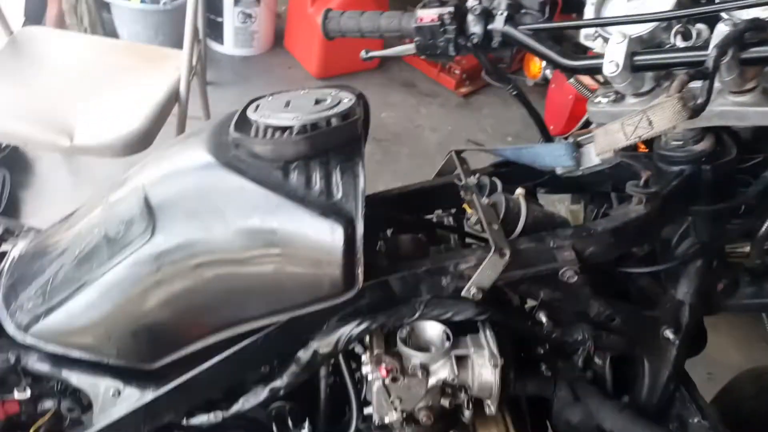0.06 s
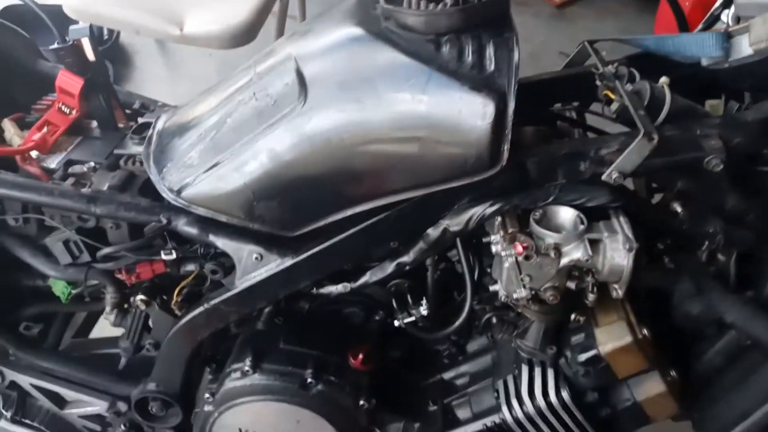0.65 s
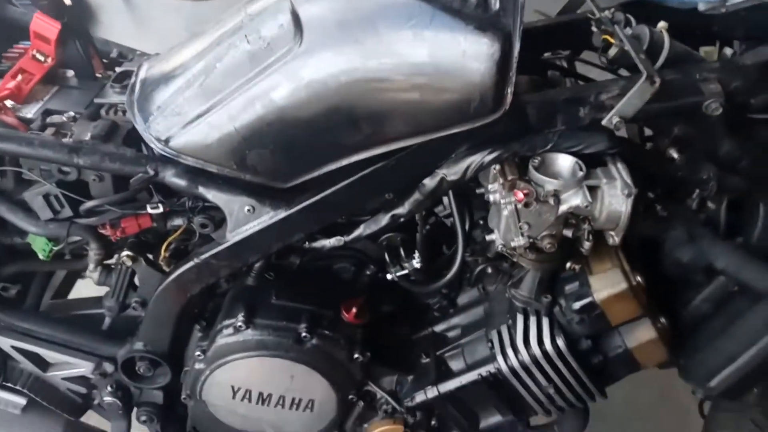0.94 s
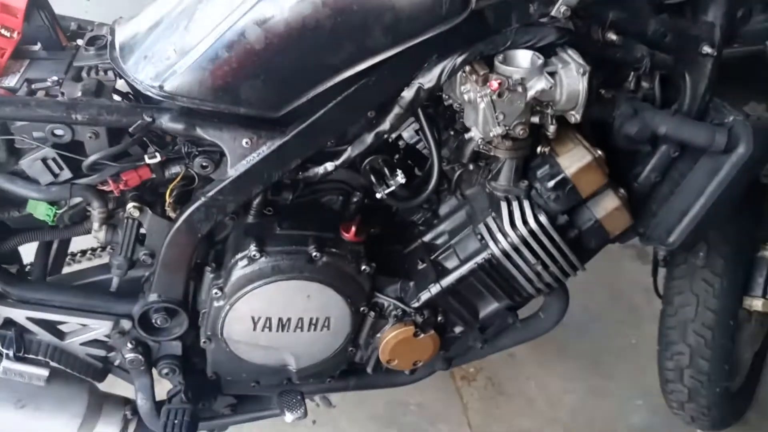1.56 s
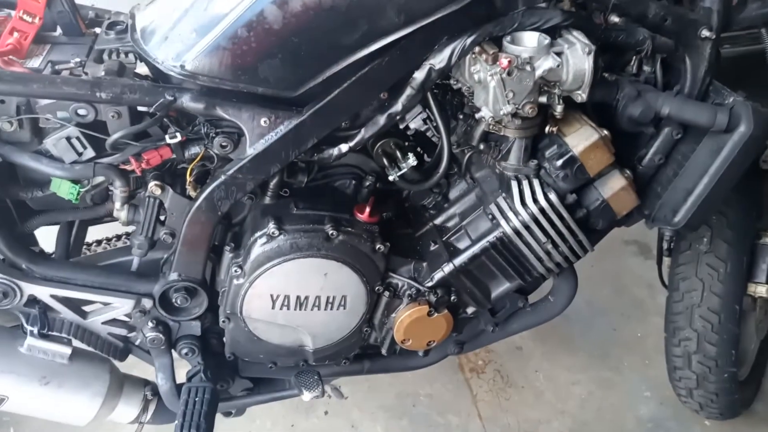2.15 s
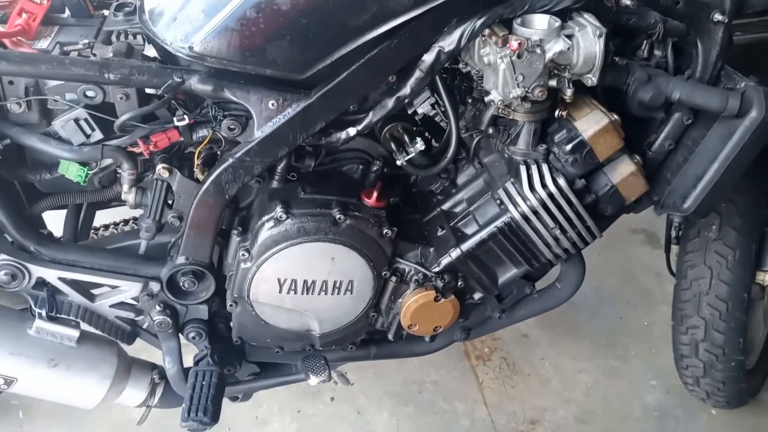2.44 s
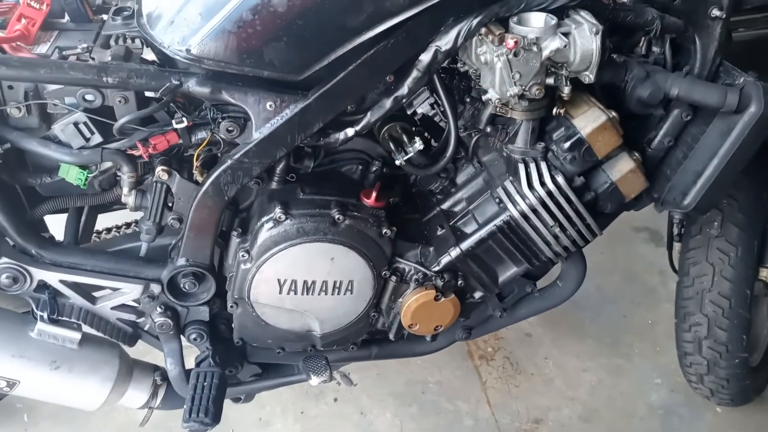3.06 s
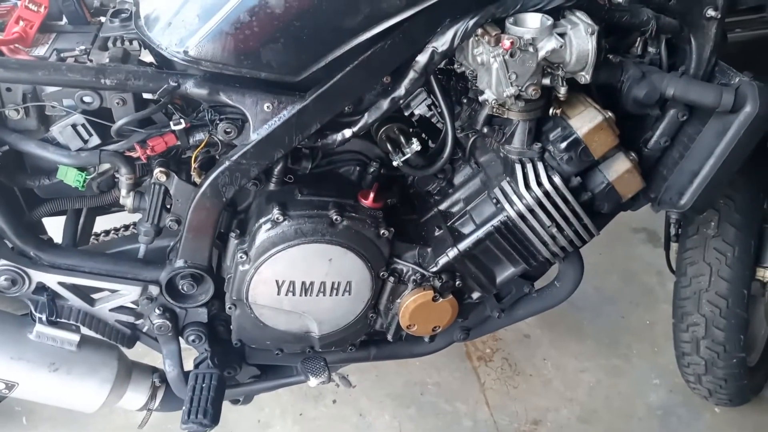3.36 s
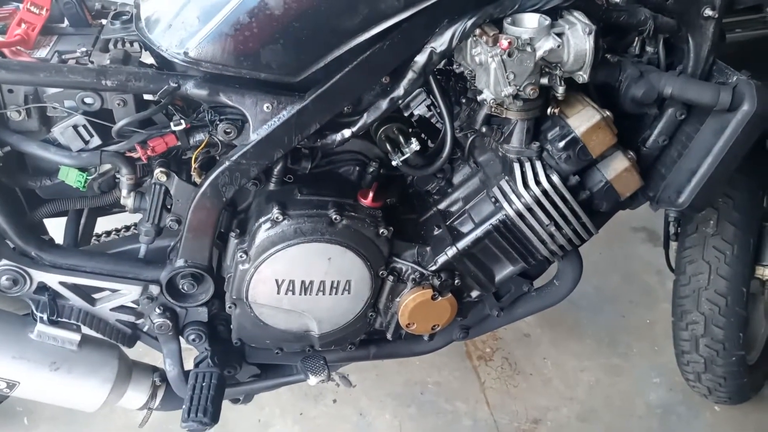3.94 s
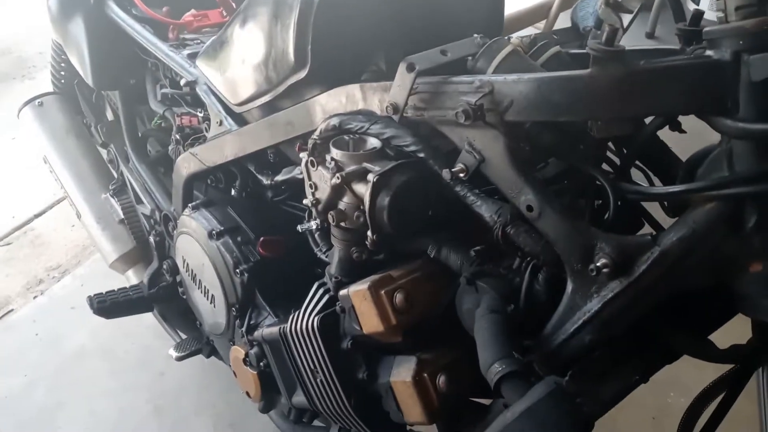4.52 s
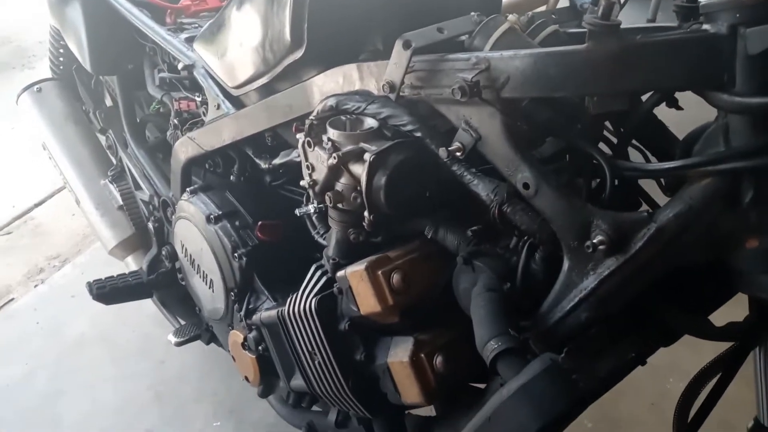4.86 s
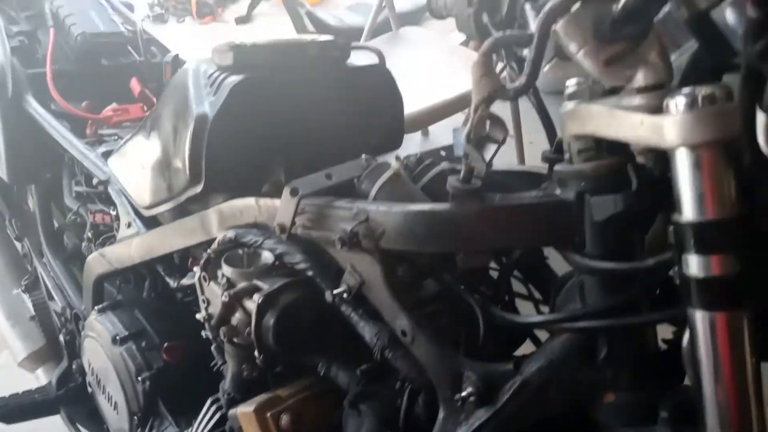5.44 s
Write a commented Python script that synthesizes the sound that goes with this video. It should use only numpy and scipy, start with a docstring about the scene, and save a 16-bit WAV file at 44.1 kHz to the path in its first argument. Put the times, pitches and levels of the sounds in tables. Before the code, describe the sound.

A motorcycle engine is revved once and sinks to a lumpy idle, then after a brief gap idles fast and steadily.

```python
"""A motorcycle booms close by in a garage: a blip of the throttle, then a slow sink to a lumpy idle
in which one of its four cylinders skips. Each firing thumps and rings the exhaust pipes; gears whine,
pistons knock, valves clatter and the open carburettor (the engine's air inlet) hisses.
After a short silence the sound fades in again from the front of the engine, at a fast, steady idle."""
import sys
import numpy as np
from scipy import signal
from scipy.fft import rfft, irfft, next_fast_len
from scipy.io import wavfile
from scipy.ndimage import uniform_filter1d, map_coordinates

SR = 44100
rng = np.random.default_rng(int(sys.argv[2]) if len(sys.argv) > 2 else 0)


def inscribe(sig):
    """Save sig as 16-bit PCM at rate SR to the path in sys.argv[1].

    A 1-D sig is mono; a 2-D sig holds one channel per row.
    Samples are clipped to [-1, 1] before scaling.
    """
    pcm = np.round(np.clip(np.atleast_2d(sig).T, -1, 1) * 32767)
    wavfile.write(sys.argv[1], SR, pcm.astype(np.int16))


N = 250929
TIME = np.arange(N) / SR


def exhaust(cycles, cylinders, pipe, first_gains, gas_db, thump_hz, puff_hz, scatter_db, jitter):
    """Each firing thumps out of the tailpipe and rings the pipes; swirling gas rings them too."""
    blows, thumps = 0, 0
    for k, (place, ring_db, thump_db) in enumerate(cylinders):
        gains = first_gains if k == 0 else every_cycle(cycles)
        firing = pulses(cycles, place, gains, scatter_db, jitter)
        blows += undb(ring_db) * firing
        thumps += undb(thump_db) * firing
    blows += undb(gas_db) * blows.std() * rng.standard_normal(N)
    puffs = resonate(blows, pipe) + band(thumps, 155, thump_hz, order=1)
    # a valve takes a moment to open, which rounds every puff
    rounded = signal.sosfilt(signal.butter(2, puff_hz, fs=SR, output="sos"), puffs)
    return steady(band(chambers(rounded), 81, 914))


def misfires(cycles, miss_db):
    """Strength of the dirty first cylinder in each cycle: when it fails to fire it only puffs."""
    # its firing pattern: (start time [s], fires once in [cycles], level when it fires [dB])
    pattern = [(0, 1, 0), (1.21, 1, -9), (1.52, 1, -3), (2.56, 2, 0), (2.83, 1, 0), (3.0, 2, 2),
               (3.72, 2, 2)]
    gains = every_cycle(cycles)
    for start_s, every, db in pattern:
        first = int(np.interp(start_s, TIME, cycles)) + 1
        fires = np.arange(len(gains) - first) % every == 0
        gains[first:] = undb(np.where(fires, db, miss_db))
    return gains


def chambers(x):
    """Each silencer chamber holds one band of pitches back a little, so a crack becomes a chuff."""
    # the delayed bands: (pitch [Hz], width [Hz])
    delayed_bands = [(450, 33), (560, 85), (660, 210), (850, 85)]
    for hz, width in delayed_bands:
        x = x - 2 * ring(x, hz, width)
    return x


def boom(cycles, speed):
    """Multiples of the engine speed swell into a hum as they slide past the pipe's own pitches."""
    # pipe hums: (multiple, pipe pitch [Hz], reach [Hz], level [dB], change at open throttle [dB],
    # place in the cycle [0-1])
    hums = [(2, 86, 3.7, -22, 3, 0.12), (4, 145, 8.7, -11, -18, 0.02), (4, 200, 4.1, -5.5, -14, 0.03),
            (7, 167, 8.5, -22.5, 0, 0.02), (8, 351.4, 31, -17.5, 24.5, 0.1), (10, 349, 23, -13, 0, 0.05),
            (12, 340, 3, -14, 0, 0.01)]
    out = 0
    for multiple, hz, reach_hz, db, open_db, place in hums:
        gain = bump(multiple * speed, hz, reach_hz) * undb(db + open_db * throttle() + 0.8 * wander(24.9))
        out += gain * np.sin(2 * np.pi * multiple * (cycles - place))
    return np.sqrt(2) * out


def intake(cycles, speed):
    """Gulps of air ring the inlet pipe with a growl, which stops once the revs have sunk."""
    # the inlet's ringing: (pitch [Hz], width [Hz], relative level [dB])
    inlet = [(357, 5.4, 4.5), (481, 73, -8.5), (554, 25, -13)]
    gulps = pulses(cycles, 0.3104, every_cycle(cycles), scatter_db=3, jitter=0.0031)
    gulps += undb(-2) * pulses(cycles, 0.045, every_cycle(cycles), scatter_db=4.5, jitter=0.011)
    growl = steady(band(chambers(resonate(gulps, inlet)), 278, 830, order=2))
    stop_s, fade_s = 1.24, 0.044
    return undb(loudness("growl", speed)) * np.clip((stop_s - TIME) / fade_s, 0, 1) * growl


def carburettor(snap_s):
    """The carburettor spits as the throttle snaps open, and the overloaded microphone crackles."""
    spit = steady(band(rng.standard_normal(N), 50, 1700, order=1) * undb(9.9 * wander(500)))
    overload_crackle = steady(band(rng.standard_normal(N), 4000, 16000, order=1) * undb(8 * wander(700)))
    air_rush = steady(band(rng.standard_normal(N), 6600, 11300, order=2))
    snap = (undb(-12.5) * spit + undb(-11.5) * overload_crackle) * bump(TIME, snap_s, 0.028)
    return snap + undb(-20.5) * air_rush * bump(TIME, snap_s, 0.095)


def clatter(colour, levels_db, knock_beat_db, hiss_beat_db, grain_db):
    """Pistons knock and valves rattle in step with the engine; air hisses at the carburettor."""
    knock_db, rattle_db, hiss_db = levels_db
    grain = grain_db * wander(650)  # many tiny impacts, shared by all three
    knocks = steady(noise(colour, 510, 1960) * undb(knock_beat_db + grain))
    rattles = steady(noise(colour, 2160, 5450) * undb(0.4 * knock_beat_db + grain))
    hiss = steady(noise(colour, 5710, 18000) * undb(hiss_beat_db + 0.61 * grain))
    return undb(knock_db) * knocks + undb(rattle_db) * rattles + undb(hiss_db) * hiss


def tank_echo(x, passing_s):
    """The fuel tank reflects sound as the listener passes; the echo's lag shrinks, so the tone sweeps."""
    lag_s = 0.00015 * np.exp((passing_s - TIME) / 0.23)
    gain = undb(-9) * bump(TIME, passing_s, 0.15)
    echo = gain * np.interp(TIME - lag_s, TIME, x)
    return (x + echo) / np.hypot(1, gain)


def gears(cycles, speed):
    """Meeting teeth whine at a pitch that follows the engine; near idle, slack teeth ring its covers."""
    # gear tones, louder near a pitch of the gear case: (multiple, level [dB], half wobble [Hz],
    # case pitch [Hz], reach [Hz], boost there [dB])
    tones = [(1, -34, 72, 3790, 190, 6.5), (2, -44, 66, 4700, 361, 17.5)]
    # ringing covers: (pitch [Hz], half wobble [Hz], level [dB], boost when slack [dB], cycle place [0-1])
    covers = [(2240, 38.3, -48.5, 19.5, .24), (3480, 61, -56.5, 18, 0.1), (4960, 65, -35, 1.5, 0.11)]
    teeth_per_cycle, slack_below_hz, slack_range_hz = 96.7, 25.9, 1.36
    out = 0
    for multiple, db, wobble, case_hz, reach_hz, boost_db in tones:
        hz = multiple * teeth_per_cycle * speed
        level_db = db + boost_db * bump(hz, case_hz, reach_hz)
        out += whine(cycles, hz, level_db, wobble, throb_db=8, place=0.24)
    slack = np.clip((slack_below_hz - speed) / slack_range_hz, 0, 1)
    for hz, wobble, db, slack_db, place in covers:
        out += whine(cycles, hz, db + slack_db * slack, wobble, throb_db=10, place=place)
    return out


def whine(cycles, hz, db, half_wobble_hz, throb_db, place):
    """A metallic tone shaken by loose gear teeth; it chirps when a firing pushes on them."""
    tone = np.sin(2 * np.pi * np.cumsum(hz + 2 * half_wobble_hz * wander(900)) / SR)
    flutter_db = throb_db * swell(cycles, place, 0.084) + 2.51 * wander(180)
    return undb(db) * steady(tone * undb(flutter_db))


def garage_rumble():
    """The faint, deep background of the room."""
    return undb(-51) * steady(band(rng.standard_normal(N), 12, 75, order=2))


def throttle():
    """How open the throttle is, from 0 to about 1: each twist opens quickly and falls shut."""
    # twists of the grip: (time [s], opening [0-1], rise time [s], fall time [s])
    twists = [(.01, 1, 0.022, 0.022), (.305, 1, 0.062, 0.1)]
    return sum(size * np.where(TIME < s, bump(TIME, s, rise_s), np.exp(-abs(TIME - s) / fall_s))
               for s, size, rise_s, fall_s in twists)


def loudness(name, speed):
    """Level in dB of one sound, from engine speed and throttle."""
    # per sound: (idle level [dB], boost when revved [dB], bend of that rise, boost at open throttle [dB])
    response = {"exhaust": (-12.5, 1, 6.5, 3.5), "gas": (-13, 8, 11, 24), "knock": (-29.5, 5.5, 0.86, 9.5),
                "rattle": (-29, 5, 1, 4.5), "hiss": (-26, 5.5, 2.5, 2), "growl": (-18.5, 2.5, 5, 10.5)}
    idle_db, revved_db, bend, open_db = response[name]
    idle_hz, revved_hz = 23, 43.8
    revs = np.maximum((speed - idle_hz) / (revved_hz - idle_hz), 1e-6)
    return idle_db + revved_db * revs ** bend + open_db * throttle()


def pulses(cycles, place, gains, scatter_db, jitter):
    """One pulse a cycle, each a little off in strength and timing (jitter is a share of a cycle)."""
    timing, strength = rng.uniform(-np.sqrt(3), np.sqrt(3), (len(gains), 2)).T
    due = np.arange(len(gains)) + place + jitter * timing
    at = np.interp(due, cycles, np.arange(N), right=N)
    size = gains * undb(scatter_db * strength)
    i, late = at.astype(int), at % 1  # each pulse is shared between two samples
    return (np.bincount(i, size * (1 - late), N + 2) + np.bincount(i + 1, size * late, N + 2))[:N]


def every_cycle(cycles):
    """A strength of 1 for each engine cycle."""
    return np.ones(int(cycles[-1]) + 1)


def swell(cycles, place, width):
    """A bump from 0 to 1, once in every cycle."""
    return bump((cycles - place + .5) % 1, .5, width)


def bump(x, centre, reach):
    """A bell curve: 1 at its centre, about a third at one reach away."""
    return np.exp(-((x - centre) / reach) ** 2)


def ring(x, hz, width):
    """Let a sound ring at one pitch; a narrower width rings longer."""
    return signal.lfilter(*signal.iirpeak(hz, hz / width, fs=SR), x)


def resonate(x, pitches):
    """Let a sound ring at all the pitches of a pipe."""
    return sum(undb(db) * ring(x, hz, width) for hz, width, db in pitches)


def band(x, lo_hz, hi_hz, order=4):
    """Keep what lies between two pitches."""
    return signal.sosfilt(signal.butter(order, [lo_hz, hi_hz], "band", fs=SR, output="sos"), x)


def noise(colour, lo_hz, hi_hz):
    """A band of noise of strength 1, shaped by colour: (pitch [Hz], relative level [dB])."""
    size = next_fast_len(N)
    f = np.maximum(np.fft.rfftfreq(size, 1 / SR), 1)
    hz, db = np.transpose(colour)
    gain = undb(np.interp(np.log(f), np.log(hz), db))
    gain /= np.sqrt((1 + (lo_hz / f) ** 16) * (1 + (f / hi_hz) ** 16))
    x = irfft(rfft(rng.standard_normal(size)) * gain, size)[:N]
    return x / x.std()


def wander(rate_hz):
    """A random drift of size about 1."""
    points = rng.standard_normal(4096)
    return 1.117 * map_coordinates(points, [TIME * rate_hz], order=1, mode="wrap")


def steady(x):
    """Hold the average strength at 1 but keep the engine's quick beat."""
    power = uniform_filter1d(uniform_filter1d(x ** 2, size=5500), size=3800)
    return x / np.sqrt(np.maximum(power, 1e-18))


def curves(table):
    """Turn each column after the first (time) into a line through time."""
    s, *columns = np.transpose(table)
    return [np.interp(TIME, s, c) for c in columns]


def undb(db):
    """Turn decibels into a multiplier."""
    return 10 ** (np.asarray(db) / 20)


def beside():
    """The blip and the long run-down, heard at the side of the engine."""
    # engine speed, where a cycle gives each cylinder one turn: (time [s], cycles per second [Hz])
    speeds = [(0, 33.45), (0.25, 35.86), (0.41, 43.68), (0.56, 43.39), (0.85, 38.158), (1.3, 32.92),
              (1.5, 32.5), (1.85, 29.61), (2.75, 25.23), (3.1, 24), (3.5, 23.13), (3.99, 22.45)]
    # firings: (place in the cycle [0-1], relative pipe ring [dB], relative thump [dB])
    cylinders = [(0.068, -3.5, -13), (0.317, 3.5, 0), (0.573, 1, -54), (0.785, -11, 1.5)]
    # the exhaust's ringing: (pitch [Hz], width [Hz], relative level [dB])
    pipe = [(91.4, 26, 10), (144.2, 9.3, 13.5), (164.7, 18, 14.5), (209, 37, 3.5), (270.4, 14, 7.5),
            (306.5, 6.9, 17), (328.7, 6.6, 16.5), (440, 8.5, -7.5), (489, 6.8, 6), (500, 13.2, -26),
            (840, 230, -6.5)]
    # tone of the clatter: (pitch [Hz], relative level [dB])
    colour = [(410, -18), (700, -8), (1260, -10), (1590, -8), (1830, -9), (2230, -7.5), (3250, -11),
              (4260, -11), (4790, -12), (7660, -17.5), (10100, -12), (15600, -35)]
    speed, = curves(speeds)
    cycles = np.cumsum(speed) / SR  # engine cycles so far
    pipes = exhaust(cycles, cylinders, pipe, misfires(cycles, miss_db=-11), loudness("gas", speed),
                    thump_hz=335, puff_hz=543, scatter_db=1.9, jitter=0.0022)
    knock_beat_db = 3.4 * swell(cycles, 0.167, 0.022) + 2.1 * swell(cycles, 0.41, 0.056)
    hiss_beat_db = 3.3 * swell(cycles, 0.52, 0.083)
    levels_db = [loudness(name, speed) for name in ("knock", "rattle", "hiss")]
    metal = clatter(colour, levels_db, knock_beat_db, hiss_beat_db, grain_db=0.93)
    roar = undb(loudness("exhaust", speed)) * pipes + boom(cycles, speed)
    air = intake(cycles, speed) + carburettor(snap_s=0.303)
    return roar + air + tank_echo(metal, passing_s=1.262) + gears(cycles, speed)


def in_front():
    """The fast idle, heard over the front of the engine."""
    # engine speed: (time [s], cycles per second [Hz])
    speeds = [(4.03, 32.7), (4.55, 32.67), (5.15, 31.59), (5.69, 31.52)]
    # levels as the listener moves along: (time [s], exhaust [dB], knock [dB], rattle [dB], hiss [dB])
    levels = [(4.35, -13.5, -24.5, -23.5, -27.3), (4.75, -13, -25, -23, -25.8), (5.2, -12, -27.5, -24, -28)]
    # firings: (place in the cycle [0-1], relative pipe ring [dB], relative thump [dB])
    cylinders = [(0.099, -2.5, -40), (0.361, 3.5, -8), (0.623, -11, -29), (0.867, -6.5, -5.5)]
    # the exhaust's ringing: (pitch [Hz], width [Hz], relative level [dB])
    pipe = [(98.4, 15, 13), (127.4, 13, 2), (168, 23.5, 17), (283.3, 24.4, 9), (341.7, 11.3, 16),
            (368.3, 10.3, 12.5), (485.2, 8, 9), (526, 41, 4), (625, 8.1, 6.5), (762, 51, 0.5),
            (886, 200, 3.5)]
    # tone of the clatter: (pitch [Hz], relative level [dB])
    colour = [(410, -31), (700, -8), (1690, -1.5), (1930, -4), (2200, -1.5), (2540, -6.5), (3080, -3.5),
              (3600, -11), (4730, -8.5), (5750, -17), (10700, -11), (15600, -33.5)]
    # gear whine: (time [s], pitch [Hz], level [dB], half wobble [Hz])
    gear_tone = [(4.1, 3210, -28, 14), (4.5, 3196, -26.5, 13), (4.8, 3170, -24.5, 18), (5.1, 3044, -30, 51),
                 (5.69, 3060, -31, 31)]
    cycles = np.cumsum(curves(speeds)[0]) / SR
    exhaust_db, *levels_db = curves(levels)
    pipes = exhaust(cycles, cylinders, pipe, every_cycle(cycles), gas_db=-17,
                    thump_hz=348, puff_hz=544, scatter_db=1.5, jitter=0.0023)
    knock_beat_db = 6.4 * swell(cycles, 0.1, 0.29) + 1.6 * swell(cycles, 0.41, 0.13)
    hiss_beat_db = 2 * swell(cycles, 0.42, 0.28)
    metal = clatter(colour, levels_db, knock_beat_db, hiss_beat_db, grain_db=0.8)
    return undb(exhaust_db) * pipes + metal + whine(cycles, *curves(gear_tone), throb_db=3.5, place=0.14)


def scene():
    """Two listening spots with a short silence between; the garage rumbles under both."""
    stop_s, resume_s, fade_in_s = 3.991, 4.026, 0.28
    rumble = garage_rumble()
    before = np.clip((stop_s - TIME) / 0.0052, 0, 1)
    after = np.clip((TIME - resume_s) / fade_in_s, 0, 1)
    return (before * (beside() + rumble) + after * (in_front() + rumble))[None]


def record(dry):
    """The microphone rounds off the loudest peaks; the highest treble is cut."""
    top_hz = 15800
    rounded = dry / (1 + dry ** 8) ** (1 / 8)
    return signal.sosfilt(signal.ellip(10, .1, 70, top_hz, fs=SR, output="sos"), rounded)


dry = scene()
out = record(dry)
inscribe(out)
```